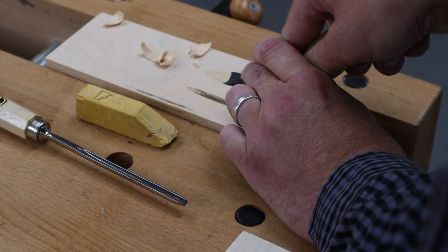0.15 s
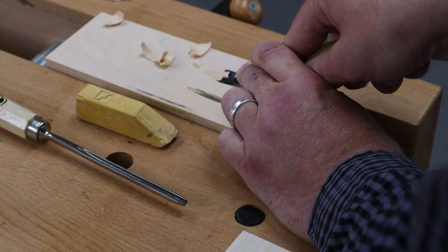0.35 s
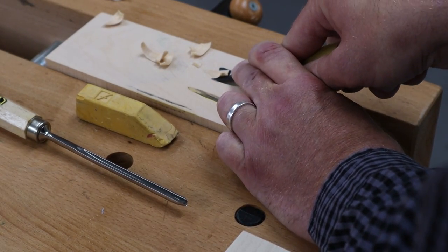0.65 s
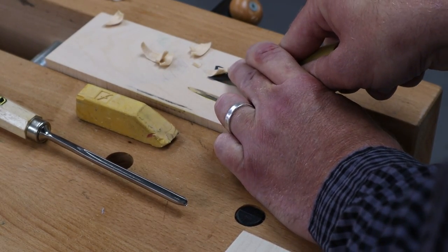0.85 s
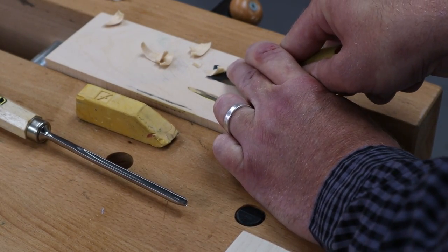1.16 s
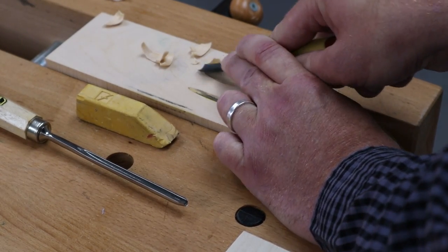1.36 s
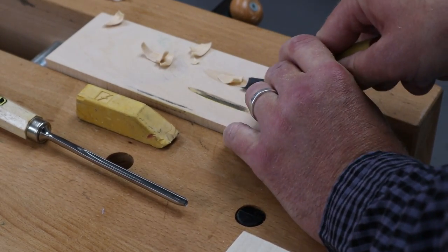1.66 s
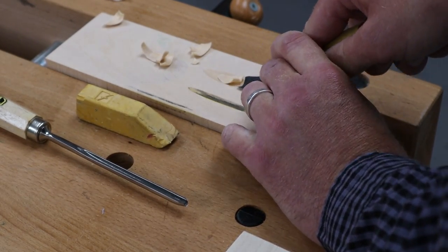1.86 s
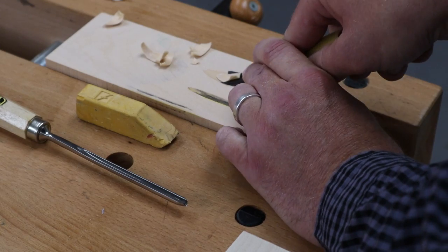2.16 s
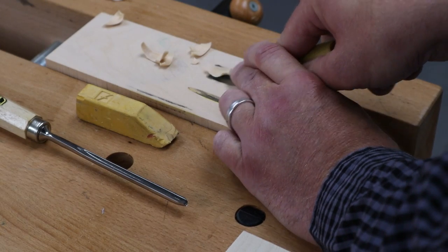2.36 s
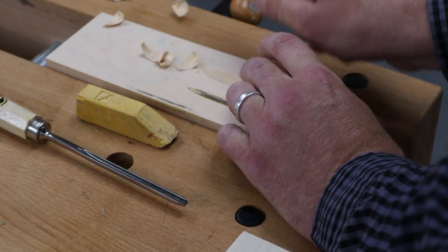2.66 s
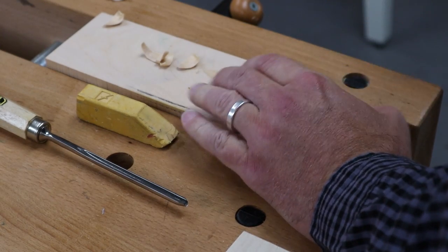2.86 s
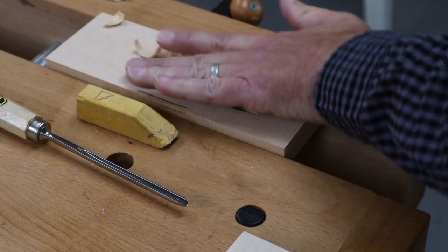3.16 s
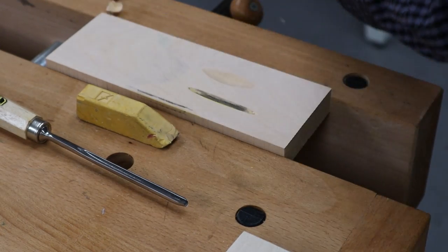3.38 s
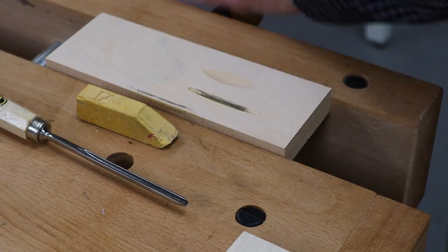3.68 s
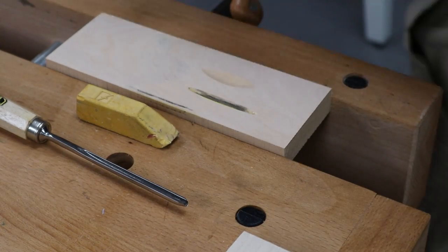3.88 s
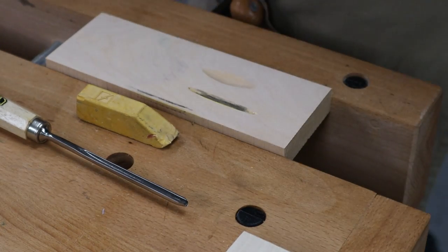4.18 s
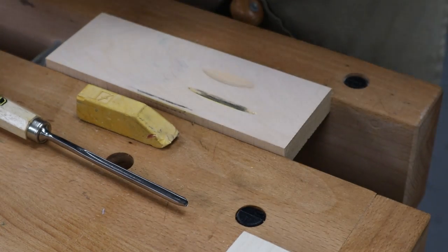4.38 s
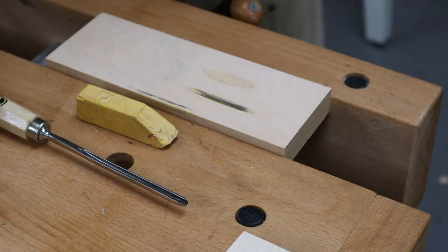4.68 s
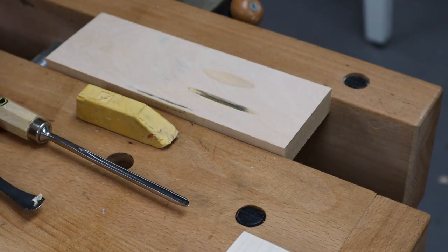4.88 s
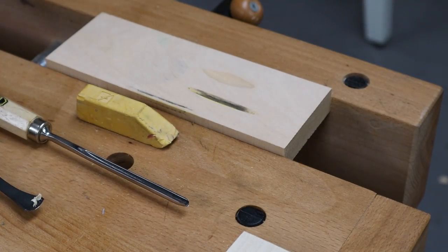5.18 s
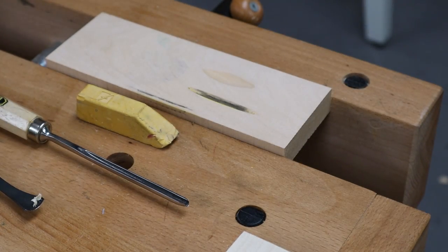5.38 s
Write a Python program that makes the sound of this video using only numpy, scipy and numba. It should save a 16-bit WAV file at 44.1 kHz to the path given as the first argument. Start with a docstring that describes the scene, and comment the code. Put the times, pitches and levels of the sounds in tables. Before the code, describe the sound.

A quiet, small workshop with a low airy hum, heard through a clip-on microphone worn on a shirt. From 0 to 2.7 seconds a hand gouge pares a clamped board: short, faint, gritty scrapes, each under a fifth of a second, some swelling to an abrupt end, clearest around 1.3, 2.1, 2.4 and 2.6. Sharp woody snaps tick at about 0.4 and 1.5. Beneath them, dull bass thuds and cloth drags jostle the microphone, crowding together between 1.4 and 2.2. Around 2.8 the clothing rumble swells as the arm moves. From 2.9 to 4.1 a palm sweeps shavings away in dry, hissing, uneven swishes with sleeve rustle and small clicks. A sharper crack and a bump come at 4.3. At 4.7 a tool lands on the bench with a hard wooden-metallic clack, bouncing several times by 4.8. Soft rustling follows, with a last microphone bump near 5.4.

```python
"""First heard: a gouge paring a clamped board, under thumps and rumble of a clip-on microphone worn on a shirt.
Then a hand sweeps the shavings off, sleeves rustling, and a tool is laid on the bench with a few bounces.
Cuts and strokes are flickering noise through board modes or gliding bands; snaps and landings are
noise bursts that ring modes; jolts and dragging cloth ring the microphone body.
A small workshop rings briefly around it over a quiet floor of air noise."""
import sys
import numpy as np
from scipy import signal
from scipy.fft import rfft, irfft
from scipy.io import wavfile
from scipy.ndimage import uniform_filter1d
from numba import njit

SR = 44100
rng = np.random.default_rng(int(sys.argv[2]) if len(sys.argv) > 2 else 0)


def dump(signal):
    """Clip the signal to [-1, 1] and save it as 16-bit WAV at the path in sys.argv[1]."""
    limited = np.clip(np.atleast_2d(signal).T, -1, 1)
    pcm = np.round(limited * 32767).astype(np.int16)
    wavfile.write(sys.argv[1], SR, pcm)


N = 244211
HOP = 32  # samples per step of the stroke gains

# Air noise spectrum: (frequency [Hz], relative level [dB])
AIR_SPECTRUM = [(15, -40), (25, -29), (64, -10.5), (123, -0.5), (263, -14.5), (476, -21), (641, -19.5),
                (775, -27.5), (1330, -31.5), (1480, -31), (3820, -38), (11900, -43.5), (16000, -48.5)]
AIR_DB = -62.5  # level within a band at 2244 Hz
ROOM_T60_S, ROOM_DB = 0.31, -8
TOP_HZ = 15900

# Slow sway of the wearer: (time [s], level [dB])
SWAY = [(0, -50), (.25, -47), (.64, -59), (1.1, -52.5), (1.57, -47), (2.1, -51.5), (3.52, -43.5),
        (3.9, -50.5), (4.03, -34.5), (4.11, -47), (4.69, -45.5), (4.87, -49), (5.12, -43.5), (5.24, -44),
        (5.53, -53)]
# Cloth dragging the microphone: (start [s], length [s], drive at end [dB], rise (+) or fall (-) to it [dB])
DRAGS = [(.08, 0.052, -47, -9), (.86, 0.85, -58, -6.5), (1.42, 0.16, -47.5, 8), (1.58, 0.19, -48, -7.5),
         (1.8, 0.27, -47, 0), (2.21, 0.035, -53, 5), (2.4, 0.26, -63, -15), (2.63, 0.058, -40.5, -5),
         (2.79, 0.18, -32, 13.5), (3.0, 0.14, -51, -12.5), (3.17, 0.17, -32.5, 11),
         (3.36, 0.17, -52, -18.5), (3.96, 0.171, -44, -2), (4.3, 0.17, -37, -1.5), (4.52, 0.34, -46, -4),
         (4.98, 0.18, -53, -4), (5.21, 0.079, -53.5, -15), (5.39, 0.14, -34, 0.5)]
DRAG_CATCH_S, DRAG_RELEASE_DB_PER_S, DRAG_REST_DB = 0.031, 294, -74.5
# Jolts of the microphone: (time [s], thud drive [dB], knock drive against thud [dB])
JOLTS = [(0.109, -24, -41), (0.85, -38, -38), (1.173, -37.5, -33), (1.401, -31.5, -31), (1.414, -26.5, -31),
         (1.569, -24, -15), (1.608, -31, -18), (1.614, -27.5, -16), (1.658, -21.5, -42),
         (1.736, -27.5, -40), (1.75, -26.5, -34), (1.881, -21.5, -34), (1.971, -26.5, -27),
         (2.048, -33, -41), (2.206, -21, -25), (2.442, -34, -28), (2.669, -42, -9), (2.78, -27, -22),
         (2.818, -26.5, -54), (2.941, -30, -31), (3.019, -35, -35), (3.2, -29.5, -35), (3.284, -26, -35),
         (3.338, -21.5, -24.5), (3.43, -33, -34), (3.969, -49, -2), (3.996, -33.5, -21), (4.15, -32.5, -24),
         (4.308, -26.5, 0.5), (4.367, -42, -4), (4.375, -24.5, -34), (4.464, -26, -39), (4.586, -31, -44),
         (4.621, -30.5, -36), (5.387, -28.5, -15)]
# Low modes of the microphone body: (frequency [Hz], gain [dB], t60 [s])
BODY_MODES = [(134.5, -4.5, 0.073), (186, -12.5, 0.017), (401, -26, 0.04)]
# Short modes of the microphone body: (frequency [Hz], gain [dB], t60 [s])
BODY_SHORT_MODES = [(850, 5.5, 0.0072), (1330, -18, 0.012), (328, 1.5, 0.014)]
THUD_PUSH_S, KNOCK_PUSH_S = 0.0022, 0.0007

# Tool landing and bouncing: (time [s], drive [dB], softness [0-1])
LANDINGS = [(4.69, -25.5, 0.25), (4.718, -42, 0), (4.731, -32, 1), (4.778, -25, 0.22), (4.807, -39, 0.55)]
# Modes of the tool: (frequency [Hz], gain [dB], t60 [s])
TOOL_MODES = [(204.4, 5.5, 0.14), (457, -3, 0.1), (740, -3.5, 0.067), (1120, 4.5, 0.06), (1270, -18, .03),
              (1487, -0.5, 0.08), (1650, -1, 0.044), (2000, -14, 0.051), (2400, -16, 0.038),
              (2830, -3, 0.025), (3280, -1, 0.022), (3318, 6, 0.037), (5500, -8, 0.019), (7000, -6, 0.029)]
# Pass band of the bench top: (low edge [Hz], high edge [Hz])
BENCH_BAND_HZ = [400, 3450]

# Resonances of board and blade: (frequency [Hz], width [Hz], gain [dB])
BOARD_MODES = [(1050, 200, 4), (1750, 136, 3), (2250, 700, 2), (3300, 270, 3.5), (4420, 380, 0.5),
               (6470, 530, 9), (8700, 3700, -3.5)]
# Fibres and seams snapping: (time [s], drive [dB], centre [Hz], ring of the board [dB])
SNAPS = [(0.3865, -27, 8700, -3), (.886, -60, 2000, 34), (1.5378, -43, 9800, 12), (1.5416, -33, 1760, 33.5),
         (2.64, -46, 6600, 12), (2.663, -36, 4930, 5), (2.732, -42, 6100, 15), (2.904, -43, 6200, 3),
         (3.362, -38, 3150, 4), (3.543, -40, 3480, 4), (3.628, -31.5, 1750, -3), (4.001, -28.5, 1650, 10),
         (4.3037, -29.5, 8750, 15.5), (4.382, -41, 2300, 18)]
SNAP_T60_S = 0.007
# the hand damps and widens the board's modes; snaps near the chest sound drier
SNAP_DAMP_HZ, SNAP_ROOM_DB = 800, -3

# Strokes of palm and sleeve: (start [s], length [s], level at end [dB], rise (+) or fall (-) to it [dB],
# hiss centre at start [Hz], hiss centre at end [Hz], dull rub against level [dB])
STROKES = [(2.93, 0.049, -64, -0.5, 4500, 5160, 9), (2.994, 0.32, -64.5, -1, 6000, 4500, -4),
           (3.254, 0.061, -49, 9.5, 5200, 6660, -9), (3.357, 0.017, -56, -10, 3520, 5200, -3),
           (3.485, 0.031, -67, 3, 4780, 4780, -17), (3.622, 0.042, -46, 22, 2510, 5600, -4),
           (3.676, 0.013, -41.5, 7, 7000, 9000, -37), (3.845, 0.099, -47.5, 2, 3630, 6030, -6.5),
           (3.949, 0.049, -56, -2.5, 4500, 4500, 8), (4.005, 0.03, -47.5, 4, 5040, 6800, -14),
           (4.051, 0.0092, -49, 2, 7000, 6850, -17), (4.115, 0.058, -61, 0.5, 5700, 5840, 2),
           (4.305, 0.02, -55, -6, 7500, 5500, -10), (4.349, 0.082, -61.5, 0, 6250, 6300, 1.5),
           (4.487, 0.035, -62, 0, 3300, 4500, -13), (4.55, 0.094, -61.5, -0.5, 7200, 5430, -3.5),
           (4.725, 0.12, -64.5, -4, 6000, 5870, -13), (4.923, 0.11, -58, 1.5, 4600, 5300, -5.5)]
# Long rustle of the sleeves: (start [s], length [s], level at end [dB], rise (+) or fall (-) to it [dB],
# hiss centre at start [Hz], hiss centre at end [Hz], dull rub against level [dB])
RUSTLE = (2.74, 3, -68.5, 0, 6000, 6500, -4)
STROKE_TOUCH_S, STROKE_RELEASE_DB_PER_S, FIZZ_DB = 0.01, 370, -13
# Parts of the hiss: (centre [share of stroke centre], width [share of stroke centre], level [dB])
HISS = [(.55, 0.68, -4), (1.012, 1.05, 1.5), (1.6, 1.1, -6.5)]
# Starts of strokes that drag shavings over the board: (from [s], to [s])
PALM_ON_BOARD_S = (2.85, 3.4)
PALM_RING_DB = -6.5  # ring of the board against the hiss

# Pushes of the gouge: (start [s], length [s], level at end [dB], rise (+) or fall (-) to it [dB],
# fibre hiss against level [dB], favoured pitch [Hz])
CUTS = [(0, 0.012, -60, -22, -23, 3300), (0.076, 0.063, -56, 16.5, -21, 1750),
        (0.194, 0.065, -70, -10, -20, 3300), (0.266, 0.11, -57.5, 3.5, -17, 2400),
        (0.48, 0.082, -66.5, 3.5, -23, 3300), (0.631, 0.064, -65.5, 5.5, -13, 2660),
        (0.725, 0.16, -65, 13, -11, 3300), (1.17, 0.027, -72, 0, -9, 3300),
        (1.24, 0.06, -53, 14.5, -5, 1750), (2.033, 0.028, -65.5, 5, -13, 6100),
        (2.11, 0.049, -49.5, 14.5, -26, 1120), (2.178, 0.0099, -56, 0, -11, 6460),
        (2.274, 0.06, -70, -6.5, -22, 1750), (2.37, 0.067, -50.5, 13.5, -12, 1750),
        (2.44, 0.025, -61, 4, -15, 1750), (2.548, 0.1, -56, 15.5, 3, 7050), (2.716, .015, -68, 0, 1, 6200)]
CUT_BITE_S, CUT_RELEASE_DB_PER_S = 0.017, 438
FAVOUR_DB, FAVOUR_WIDTH = 2, .35  # favoured band added to the tear; width as a share of its pitch


def undb(db):
    """dB to gain."""
    return 10 ** (np.asarray(db) / 20)


def unit(x):
    """Scale to rms 1."""
    return x / np.sqrt(np.mean(x ** 2))


def curves(table):
    """Level column of a (time [s], level [dB]) table, one value a sample."""
    time_s, db = np.transpose(table)
    return np.interp(np.arange(N) / SR, time_s, db)


@njit
def svf(x, hz, width):
    """State-variable band-pass whose centre may move; gain 1 at the centre."""
    y, band_state, low_state = np.empty(len(x)), 0., 0.
    for i in range(len(x)):
        g, k = np.tan(np.pi * hz[i] / SR), width[i] / hz[i]
        v = (band_state + g * (x[i] - low_state)) / (1 + g * (g + k))
        band_state = 2 * v - band_state
        low_state = low_state + 2 * g * v
        y[i] = k * v
    return y


def band(x, hz, width):
    """Band-pass with scalar or moving centre and width in Hz."""
    one = np.ones(len(x))
    return svf(x, np.clip(hz * one, 20., .45 * SR), np.maximum(width * one, 5.))


def steep(x, hz, width):
    """Band-pass applied twice."""
    return band(band(x, hz, width), hz, width)


def ring(x, modes):
    """Exponentially decaying modes driven by x."""
    out = 0
    for hz, db, t60_s in modes:
        pole = np.exp(2j * np.pi * hz / SR - np.log(1000) / (t60_s * SR))
        out = out + undb(db) * signal.lfilter([1], [1, -pole], x).imag
    return out


def blows(times_s, gains, push_s):
    """A smooth push of area gain at each time."""
    x = np.zeros(N)
    x[(np.asarray(times_s) * SR).astype(int)] = gains
    push = np.hanning(int(push_s * SR) + 3)
    return np.convolve(x, push / push.sum())[:N]


def walk(rate_hz):
    """Random levels held 1 / rate_hz s and slewed twice."""
    k = int(SR / rate_hz)
    held = np.repeat(rng.standard_normal(N // k + 1), k)
    return uniform_filter1d(uniform_filter1d(held, k), k)[:N]


def grit(rate_hz, flicker_db=7.0):
    """Dense friction grains of uneven size whose strength flickers at rate_hz."""
    scatter_db = np.minimum(2.5 * rng.exponential(size=N), 17)
    return unit(rng.standard_normal(N) * undb(scatter_db + flicker_db * walk(rate_hz)))


def strokes(rows, attack_s, release_db_per_s):
    """One gain row per stroke: quick catch, swell or sink in dB to the level at its end, then a steady fade."""
    start_s, length_s, end_db, change_db = np.transpose(rows)[:4, :, None]
    t = np.arange(0, N + HOP, HOP) / SR - start_s
    still_to_change_db = change_db * np.clip(1 - t / length_s, 0, 1)
    fade_db = release_db_per_s * np.maximum(t - length_s, 0)
    return np.clip(t / attack_s, 0, 1) * undb(end_db - still_to_change_db - fade_db)


def blend(gains, db=0):
    """Power sum of stroke gains, each scaled by its db, one value a sample."""
    total = np.sqrt(np.sum((gains.T * undb(db)) ** 2, axis=1))
    return np.interp(np.arange(N) / HOP, np.arange(len(total)), total)


def loudest(gains, hz):
    """Power-weighted mean of the strokes' pitches, one value a sample."""
    return (blend(gains * np.sqrt(hz)) / blend(gains)) ** 2


def board(x, resonance=band, damp_hz=0):
    """Resonances of board and blade, alternating in sign and widened by damp_hz."""
    out = 0
    for k, (hz, width_hz, db) in enumerate(BOARD_MODES):
        mode = resonance(x, hz, width_hz + damp_hz) / np.sqrt(width_hz)
        out = out + (-1) ** k * undb(db) * mode
    return out


def chatter(rate_hz, patchy_db):
    """The board's resonances, each driven by its own uneven grains and wandering a little in pitch."""
    out = 0
    for hz, width_hz, db in BOARD_MODES:
        level = undb(db + patchy_db * walk(rate_hz))
        grains = grit(rate_hz=60, flicker_db=4.0)
        wandering_hz = hz * (1 + 0.014 * walk(rate_hz))
        out = out + level * band(grains, wandering_hz, width_hz) / np.sqrt(width_hz)
    return unit(out)


def air():
    """Shaped noise of the room whose level drifts a little."""
    hz, db = np.transpose(AIR_SPECTRUM)
    f = np.arange(N // 2 + 1) * SR / N + 1
    shape = undb(np.interp(np.log(f), np.log(hz), db))
    noise = irfft(shape * rfft(rng.standard_normal(N)), N)
    drift_db = 1.5 * walk(3)
    return noise * undb(AIR_DB + drift_db) / np.std(band(noise, 2244, 12200))


def room(x):
    """Diffuse tail, a decaying noise that starts after the first walls answer."""
    t = np.arange(int(.5 * SR)) / SR
    tail = rng.standard_normal(len(t)) * undb(-60 * t / ROOM_T60_S) * (t > .006)
    return signal.fftconvolve(x, tail / np.linalg.norm(tail))[:N] * undb(ROOM_DB)


def microphone_body():
    """Drag and jolts ring the low body modes; jolts also knock the short modes; sway rumbles below."""
    rub = rng.standard_normal(N) * undb(3.75 * walk(30))
    drag_gain = blend(strokes(DRAGS, DRAG_CATCH_S, DRAG_RELEASE_DB_PER_S)) + undb(DRAG_REST_DB)
    drag = rub * drag_gain
    drone = ring(drag, BODY_MODES) / np.std(ring(rng.standard_normal(N), BODY_MODES))
    scuff = undb(-42.5) * ring(drag, BODY_SHORT_MODES)  # the rough weave also reaches the short modes

    rumble = steep(rng.standard_normal(N) * undb(3.9 * walk(25)), 18, 47.7)
    sway = undb(curves(SWAY)) * unit(rumble)

    time_s, db, knock_db = np.transpose(JOLTS)
    thud = -ring(blows(time_s, undb(db + 6.5), THUD_PUSH_S), BODY_MODES)
    edge = ring(blows(time_s, undb(db + knock_db + 5.0), KNOCK_PUSH_S), BODY_SHORT_MODES)
    knock = -band(edge, 590, 1600)
    # the springy clip passes the body modes on slowly, so each thud swells over a cycle
    through_clip = band(drone + thud, 137.0, 93)
    return through_clip + undb(-2.5) * steep(drone, 277, 304) + sway + knock + scuff


def tool():
    """Each landing is a click and a loose rattle that ring the tool and clatter through the bench top."""
    out, t = np.zeros(N), np.arange(int(.4 * SR)) / SR
    bench_top = signal.butter(7, BENCH_BAND_HZ, "bandpass", fs=SR, output="sos")
    for time_s, db, softness in LANDINGS:
        click_and_noise = rng.standard_normal(len(t)) + 4.0 * (t == 0)
        decay = undb(-60 * np.maximum(t - .004, 0) / 0.022) + undb(-12.0 - 60 * t / 0.3)
        rattle = click_and_noise * decay
        hard = undb(-40) * ring(rattle, TOOL_MODES) + signal.sosfilt(bench_top, rattle)
        # a softer contact moves the sound toward the low modes
        dull = undb(16.5) * np.minimum(t / 0.015, 1) * steep(hard, 383, 460)
        out[int(time_s * SR):][:len(t)] += undb(db) * ((1 - softness) * hard + softness * dull)
    return out


def snaps():
    """Each snap is a crack and a fast-dying crackle around its centre; both also ring the board."""
    out, t = np.zeros(N), np.arange(int(.08 * SR)) / SR
    for time_s, db, hz, wood_db in SNAPS:
        burst = (rng.standard_normal(len(t)) + 5 * (t == 0)) * undb(db - 60 * t / SNAP_T60_S)
        crack = band(burst, hz, 0.2 * hz)
        wood = board(steep(burst, 3700, 6400), steep, SNAP_DAMP_HZ) * undb(wood_db)
        out[int(time_s * SR):][:len(t)] += crack + wood
    return out


def hand():
    """Skin and cloth hiss in patches, gliding along each stroke, over a dull rub; the board rings too."""
    rows = np.array([*STROKES, RUSTLE])
    move = strokes(rows, STROKE_TOUCH_S, STROKE_RELEASE_DB_PER_S) + 1e-9  # avoids 0 / 0 in loudest
    start_s, length_s, _, _, start_hz, end_hz = rows.T[:6, :, None]
    along = np.clip((np.arange(move.shape[1]) * HOP / SR - start_s) / length_s, 0, 1)
    hz = loudest(move, start_hz * (end_hz / start_hz) ** along)
    hiss = 0
    for centre, width, db in HISS:
        grains = grit(rate_hz=45, flicker_db=3.5)
        hiss = hiss + undb(db) * unit(steep(grains, centre * hz, width * hz))
    fizz = undb(FIZZ_DB) * unit(steep(grit(rate_hz=29), 7900, 11000))
    dull = blend(move, rows[:, 6]) * unit(steep(grit(rate_hz=30), 620, 1100))
    on_board = (rows[:, 0] > PALM_ON_BOARD_S[0]) & (rows[:, 0] < PALM_ON_BOARD_S[1])
    wood = blend(move[on_board], PALM_RING_DB) * chatter(rate_hz=25, patchy_db=3.5)
    return blend(move) * (unit(hiss) + fizz) + dull + wood


def gouge():
    """Tearing fibres drive board and blade, more so near the favoured pitch; a finer hiss lies above."""
    rows = np.array(CUTS)
    push = strokes(rows, CUT_BITE_S, CUT_RELEASE_DB_PER_S) + 1e-9  # avoids 0 / 0 in loudest
    hz = loudest(push, rows[:, 5:])
    tear = chatter(rate_hz=45, patchy_db=3.0)
    tear = tear + undb(FAVOUR_DB) * band(tear, hz, FAVOUR_WIDTH * hz)
    fine = steep(grit(rate_hz=140, flicker_db=6.0), 6100, 22000)
    return blend(push) * unit(tear) + blend(push, rows[:, 4]) * unit(fine)


def scene():
    """Bench sounds fill the room; the microphone's own body and the air stay dry."""
    bench, cracks = gouge() + hand() + tool(), snaps()
    reverb = room(bench + undb(SNAP_ROOM_DB) * cracks)
    return (bench + cracks + reverb + microphone_body() + air())[None]


def record(dry):
    """Steep elliptic low-pass of the recorder at TOP_HZ."""
    return signal.sosfilt(signal.ellip(10, .2, 70, TOP_HZ, fs=SR, output="sos"), dry)


dry = scene()
out = record(dry)
dump(out)
```